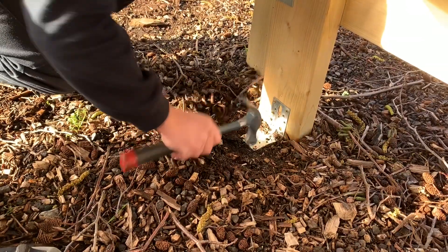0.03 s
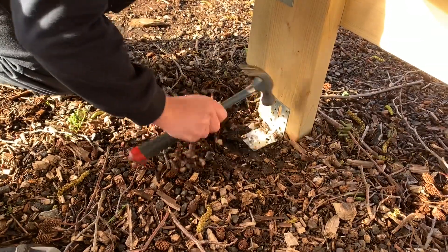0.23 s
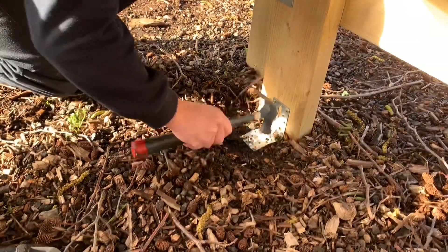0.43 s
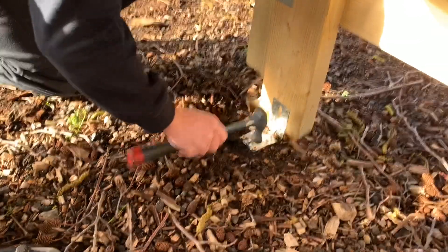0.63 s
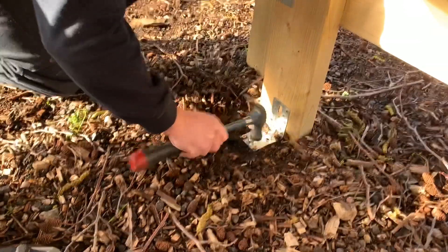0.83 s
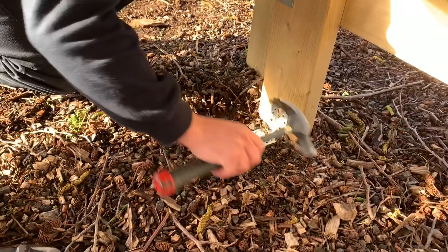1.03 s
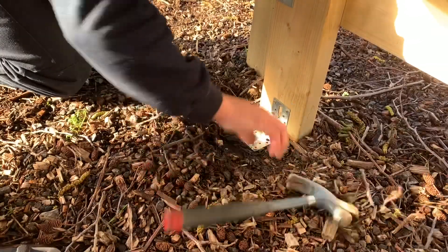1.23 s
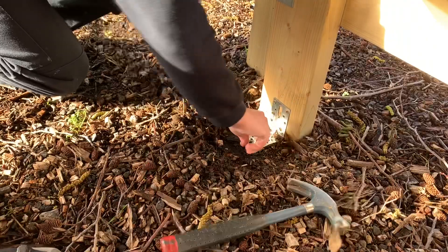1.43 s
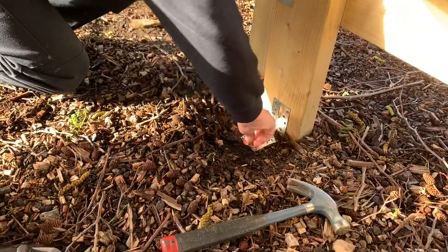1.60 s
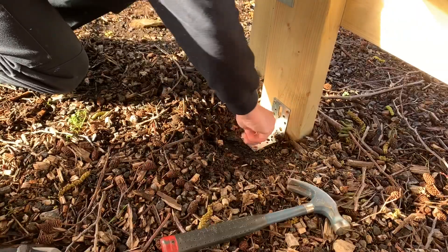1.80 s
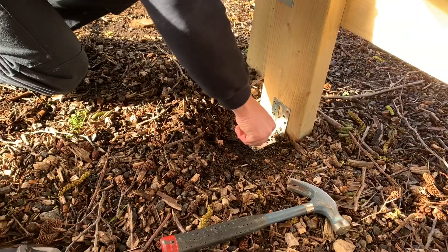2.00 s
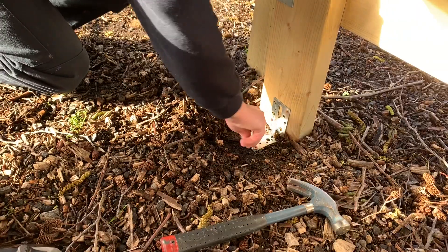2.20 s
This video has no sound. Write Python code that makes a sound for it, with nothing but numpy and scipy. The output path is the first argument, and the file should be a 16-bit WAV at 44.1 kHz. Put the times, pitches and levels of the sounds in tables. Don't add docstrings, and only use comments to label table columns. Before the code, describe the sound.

Hammer strikes a bolt in a steel bracket four times, then drops onto bark mulch outdoors

```python
import sys
import numpy as np
from scipy import signal
from scipy.fft import rfft, irfft, next_fast_len
from scipy.io import wavfile
from scipy.ndimage import uniform_filter1d

SR = 44100
rng = np.random.default_rng(int(sys.argv[2]) if len(sys.argv) > 2 else 0)


def to_linear_factor(level_db):
    exponent = np.asarray(level_db, float) / 20
    return 10 ** exponent


def output_pcm(signal):
    pcm = np.clip(np.atleast_2d(signal).T, -1, 1) * 32767
    wavfile.write(sys.argv[1], SR, np.round(pcm).astype(np.int16))


N = 99269

HEAD_RING_S = 1.249
GROUND_LOOSENESS, RING_LOOSENESS = 0.53, 0.63
MODE_SCATTER_DB = 3.3


def rms_one(x):
    return x / np.sqrt(np.mean(x ** 2) + 1e-20)


def at_hz(table, hz, order=1):
    table = np.array(table)
    return np.interp(np.log(hz), np.log(table[:, 0]), table[:, order])


def drift(rate_hz):
    hop = 40
    pole = np.exp(-2 * np.pi * rate_hz * hop / SR)
    noise = rng.standard_normal(N // hop + 2002)
    slow = signal.lfilter([1], [1, -2 * pole, pole * pole], noise)[2000:]
    return np.interp(np.arange(N) / hop, np.arange(len(slow)), rms_one(slow))


def bands(x, low_hz):
    lows = low_hz * 2 ** np.arange(0, np.log2(18000 / low_hz), .5)
    for k, low in enumerate(lows):
        high = min(low * np.sqrt(2), 19000)
        band_pass = signal.butter(2, [low, high], "band", fs=SR, output="sos")
        yield np.sqrt(low * high), signal.sosfilt(band_pass, x[k % 2])


def add(out, s, sound):
    i = int(s * SR)
    out[max(i, 0):i + len(sound)] += sound[max(-i, 0):len(out) - i]


def struck(modes, rise_cycles, looseness, tilt=0, delay_cycles=0):
    hz, db, t60 = np.array(modes).T[:, :, None]
    t = np.maximum(np.arange(SR // 3) / SR - delay_cycles / hz, 0)
    level_luck, phase_luck = rng.standard_normal((2, len(modes), 1))
    swell = (1 - np.exp(-t * hz / rise_cycles)) ** 2
    tilt_db = tilt * np.log2(hz / 1200)
    gain = to_linear_factor(db + tilt_db + MODE_SCATTER_DB * level_luck - 60 * t / t60)
    phase = np.pi * np.arange(len(modes))[:, None] + looseness * phase_luck
    return (gain * swell * np.sin(2 * np.pi * hz * t + phase)).sum(axis=0)


def dying_noise(table, hold_s=0):
    t = np.maximum(np.arange(SR // 3) / SR - hold_s, 0)
    out = 0
    for hz, band in bands(rng.standard_normal((2, len(t))), 254.1):
        out = out + to_linear_factor(at_hz(table, hz) - 60 * t / at_hz(table, hz, order=2)) * band
    return out


def air():
    # frequency in Hz, level in dB per Hz.
    air_spectrum = [(25, -6.5), (60, 3.5), (130, -7.5), (340, -15), (600, -21), (2500, -25.5), (6300, -40),
                    (8000, -56), (16500, -58.5)]
    # frequency in Hz, shared part from 0 to 1.
    likeness = [(50, .2), (200, .7), (500, .3), (6000, 0), (7500, .997)]
    # time in seconds, level in dB.
    gusts = [(0.0, -70), (0.12, -48), (0.26, -53.5), (0.58, -50.5), (0.73, -47.5), (0.97, -48.5),
             (1.06, -54.5), (1.47, -57), (1.57, -54.5), (1.87, -55), (2.02, -49.5), (2.25, -51)]
    gust_top_hz = 160
    hum_hz, hum_width_hz = 203.1, 10
    air_db, hum_db = -44, -60.5
    out, together = 0, drift(0.5)
    gust_db = np.interp(np.arange(N) / SR, *np.transpose(gusts))
    gust_db = gust_db - gust_db.mean()
    for hz, (mid, side) in bands(rng.standard_normal((2, 2, N)), 27.96):
        alike = np.clip(at_hz(likeness, hz), 0, 1)
        pair = np.sqrt(1 + alike) * mid + np.sqrt(1 - alike) * side * [[1], [-1]]
        patchy_db = at_hz([(80, 4.5), (400, 1.5), (3000, 0.58)], hz)
        wander_db = patchy_db * (.6 * together + drift(5.4))
        wind_db = gust_db / (1 + (hz / gust_top_hz) ** 2)
        out = out + to_linear_factor(at_hz(air_spectrum, hz) + wind_db + wander_db) * pair
    b, a = signal.iirpeak(hum_hz, hum_hz / hum_width_hz, fs=SR)
    hum = signal.lfilter(b, a, rng.standard_normal(N))
    return to_linear_factor(air_db) * rms_one(out) + to_linear_factor(hum_db) * rms_one(hum)


def crunches():
    # start in seconds, level in dB, length in
    # seconds, brightness in dB per octave.
    grain_bursts = [(0.151, -48.5, .004, -7), (0.235, -56, 0.0037, -12), (0.433, -67, .004, -3.5),
                    (0.637, -61, .003, -2), (1.092, -64.5, 0.15, 0), (1.1437, -34.5, 0.0051, -6),
                    (1.15, -38, 0.013, -1.9), (1.242, -32, 0.0096, -2.5), (1.253, -41.5, 0.0036, 1.5),
                    (1.331, -52, 0.024, -6), (1.429, -60.5, 0.012, 5), (1.468, -63, 0.014, -4),
                    (1.852, -55, .01, -15.5), (2.156, -78.5, 0.04, -7),
                    (1.3335, -44, .003, -5),
        (1.4222, -46, .003, -3.5),
        (1.8505, -47, .003, -6),
        (1.63, -54, .05, -10),
        (1.755, -53, .045, -10),
        (2.05, -53, .03, -10),
    ]
    grains_per_s, grain_spread_db = 6000, -1
    crunch_low_hz, scrape_low_hz = 735, 960
    out = np.zeros(N)
    for s, db, length, tilt in grain_bursts:
        t = np.arange(SR // 5) / SR / length
        shape = (2, len(t))
        hits = rng.random(shape) < grains_per_s / SR
        sizes = to_linear_factor(grain_spread_db * rng.exponential(1, shape))
        grains = hits * sizes * rng.standard_normal(shape)
        low_hz = crunch_low_hz if s < HEAD_RING_S else scrape_low_hz
        coloured = sum(to_linear_factor(tilt * np.log2(hz / 4000)) * band for hz, band in bands(grains, low_hz))
        envelope = np.minimum(t * 12, 1) * np.exp(-t ** 2)
        add(out, s, to_linear_factor(db) * rms_one(coloured) * envelope)
    return out


def landing():
    # frequency in Hz, level in dB, t60 in seconds.
    handle = [(73.2, -22.5, 0.13), (160, -41, 0.099), (250, -44, .1), (1127, -45, 0.14), (1460, -23, 0.039),
              (1660, -28.5, 0.037), (1880, -25.5, 0.04), (2570, -34, 0.013), (3310, -35, 0.03),
              (3620, -40.5, 0.013)]
    # frequency in Hz, level in dB, t60 in seconds.
    head = [(8860, -55, 0.029), (11130, -26.5, 0.023), (11300, -45, 0.033), (14200, -43, .046)]
    out = np.zeros(N)
    add(out, 1.2435, struck(handle, 0.75, GROUND_LOOSENESS, delay_cycles=0.53))
    add(out, HEAD_RING_S, struck(head, 8.7, RING_LOOSENESS))
    return out


def blows():
    # start in seconds, then bracket, post, ground thump and crack levels in dB.
    contacts = [
        (-.0012, -14.5, -4.5, -24, -7.5),
        (0.0471, -20, -19, -22, -18),
        (0.2705, -15, -11.5, -11, -11),
        (.3000, -33.5, -43, -29, -24),
        (0.534, -17, -14, -15, -12.5),
        (0.5757, -25.5, -29, -30, -23.5),
        (0.7606, -14, -16, -11, -17.5),
        (0.8147, -32, -28.5, -30.5, -23.5),
    ]
    contact_tilts = [2.6, 4.5, -1.1, -0.5, -3, -5, -4.5, 5]
    # frequency in Hz, level in dB, t60 in seconds.
    bracket = [(616.3, -3.5, 0.044), (801, 4, 0.042), (909, -1, 0.076), (1104, 7.5, 0.021),
               (1244.7, 6, 0.048), (1359, 12.5, 0.016), (1592, 11, 0.039), (1972, 3.5, 0.029),
               (2550, -24, 0.029), (2890, -10.5, 0.023), (3260, -3.5, 0.013), (4045, 1, 0.025),
               (4488, -16, 0.064), (5150, 0.5, .03)]
    # frequency in Hz, level in dB, t60 in seconds.
    post = [(339, -6.5, 0.13), (409, 6.5, 0.057), (480, -16.5, 0.019)]
    # frequency in Hz, level in dB, t60 in seconds.
    ground = [(63.7, -8.5, 0.25), (93.6, -12.5, 0.23), (126, -2.5, 0.11), (163.8, -5.5, 0.14),
              (209.8, 2, 0.13), (289.8, -5, 0.0928)]
    # frequency in Hz, level in dB per Hz, t60 in seconds.
    crack = [(1500, -13.5, 0.0062), (4300, 21, 0.0031), (6500, -0.5, 0.022), (10500, 9, 0.0071),
             (13785, 10.5, 0.005), (16000, -24, .007)]
    # frequency in Hz, level in dB per Hz, t60 in seconds.
    rattle = [(278, 3, 0.22), (850, -6.5, 0.14), (2355, -56, 0.36), (5900, -15.5, 0.043),
              (11000, -32, 0.063), (16000, -34.5, .06)]
    # frequency in Hz, level in dB per Hz, t60 in seconds.
    chatter = [(411, -7.5, 0.026), (674, 6.5, .05), (1500, 17.5, 0.036), (4000, -14.5, .035),
               (9000, -8, 0.024), (16000, -17, 0.021)]
    bolted = [(hz, db, min(t60, 130 / hz)) for hz, db, t60 in bracket]
    out = np.zeros(N)
    for (s, bracket_db, post_db, ground_db, crack_db), tilt in zip(contacts, contact_tilts):
        metal = struck(bolted, 1.2, RING_LOOSENESS, tilt)
        metal = metal + to_linear_factor(7) * dying_noise(rattle) + dying_noise(chatter, hold_s=0.0076)
        timber = struck(post, 1.5, RING_LOOSENESS)
        thump = struck(ground, 0.37, GROUND_LOOSENESS, delay_cycles=.3)
        add(out, s, to_linear_factor(bracket_db) * metal + to_linear_factor(post_db) * timber
            + to_linear_factor(ground_db) * thump + to_linear_factor(crack_db) * dying_noise(crack))
    return out


def ports(x):
    # frequency in Hz, phase lead in radians, smeared share from 0 to 1.
    right_port = [(60, 1.5, .05), (150, -.1, .03), (350, .4, .1), (700, .5, .2), (1400, -.8, .3),
                  (2200, 1.6, .45), (4000, 1.2, .55), (6300, 3.14, .5), (7300, 3.14, 0)]
    # frequency in Hz, gain in dB.
    right_gain = [(60, -.5), (150, 1.0), (350, -1.0), (650, 3.0), (1200, -2.5), (2500, -1.0), (5000, 3.0),
                  (7300, 0)]
    lead_s, smear_s = 10 / SR, .005
    left_smear, quiet_smear, loud_db = .08, .2, -12
    size = next_fast_len(N + SR // 4)
    hz = np.arange(size // 2 + 1) * SR / size + 0.00064
    lag = np.minimum(np.arange(size), size - np.arange(size)) / SR
    smear = rfft(rng.standard_normal((2, size)) * np.exp(-lag / smear_s))
    smear /= np.sqrt(uniform_filter1d(abs(smear) ** 2, size=size * 120 // SR))
    phase = 2 * np.pi * hz * lead_s + at_hz(right_port, hz)
    turn = to_linear_factor(at_hz(right_gain, hz)) * np.exp(1j * phase)
    power = uniform_filter1d(x[0] ** 2, size=440)
    loud = x * np.clip(power / to_linear_factor(2 * loud_db), 0, 1)
    out = 0
    for part, depth in ((loud, 1), (x - loud, quiet_smear)):
        share = depth * at_hz(right_port, hz, order=2) * [[left_smear], [1]]
        out = out + rfft(part, size) * (np.sqrt(1 - share) + np.sqrt(share) * smear)
    return irfft(out * [turn ** 0, turn], size)[:, :N]


def scene():
    return blows() + crunches() + landing() + air()


def low_pass(x):
    return signal.sosfilt(signal.butter(12, 17050, fs=SR, output="sos"), x)


def record(dry):
    top, bottom = 0.52, 1
    squashed = np.where(dry > 0, top * np.tanh(dry / top), bottom * np.tanh(dry / bottom))
    x = ports(squashed)
    x = signal.sosfilt(signal.butter(2, 38, "high", fs=SR, output="sos"), x)
    x = signal.sosfilt(signal.cheby2(12, 70, 17100, fs=SR, output="sos"), x)
    x = np.clip(x, -.93, .8)
    return low_pass(x)


dry = scene()
out = record(dry)
output_pcm(out)
```